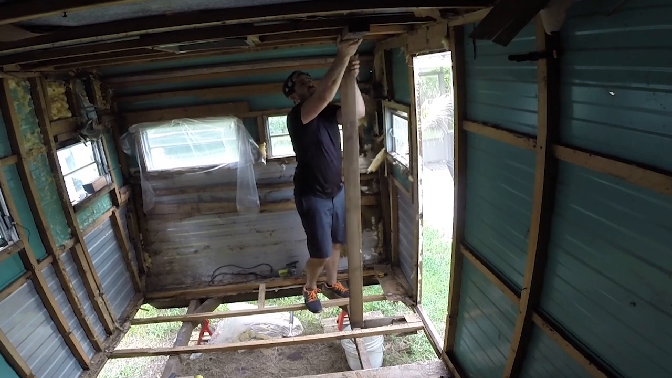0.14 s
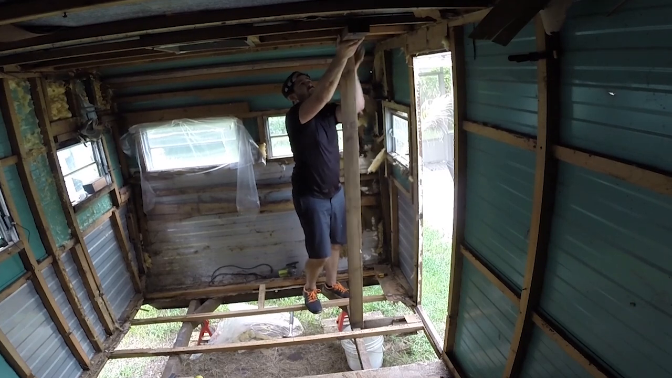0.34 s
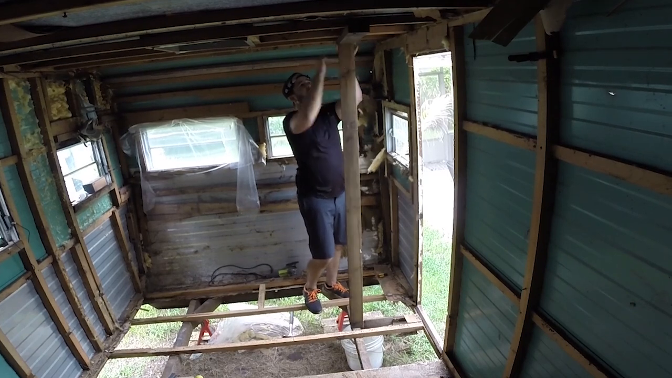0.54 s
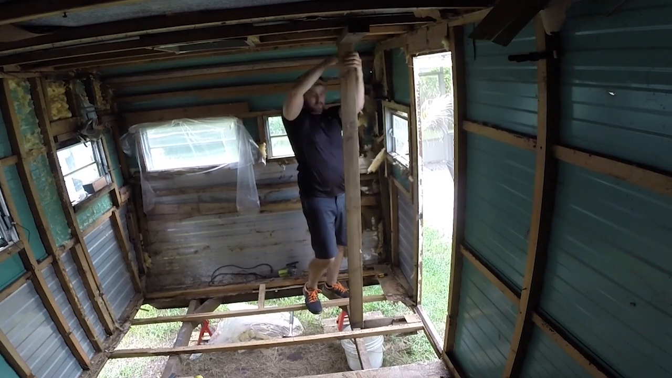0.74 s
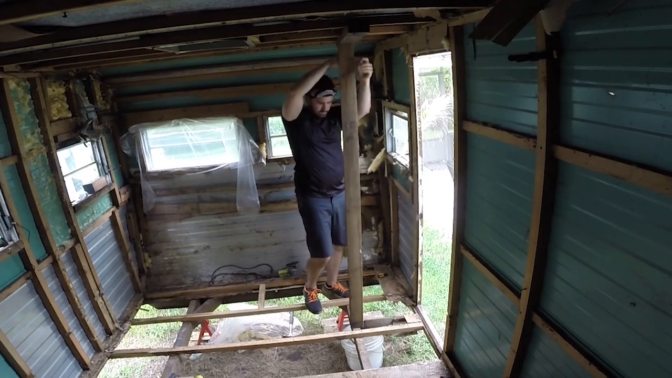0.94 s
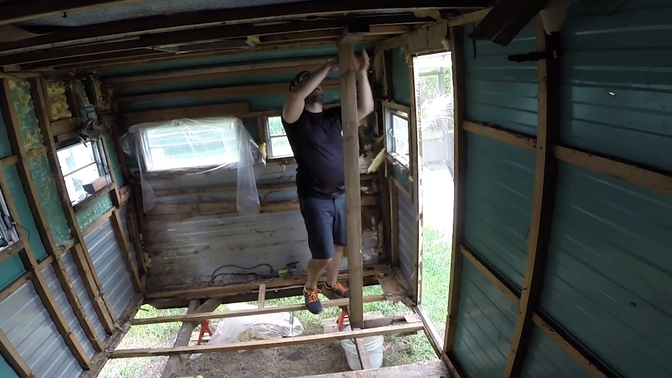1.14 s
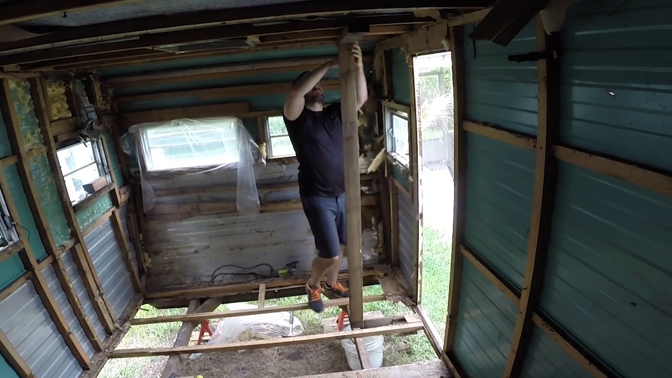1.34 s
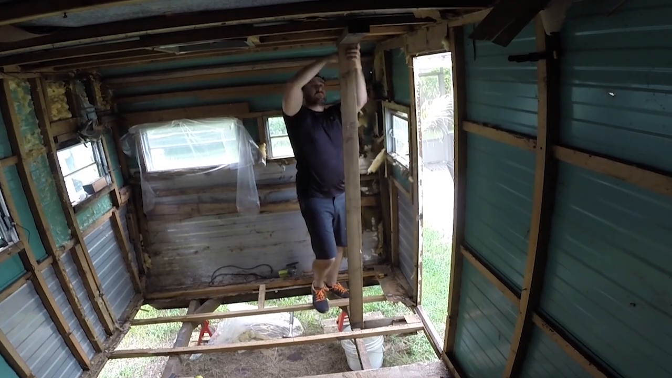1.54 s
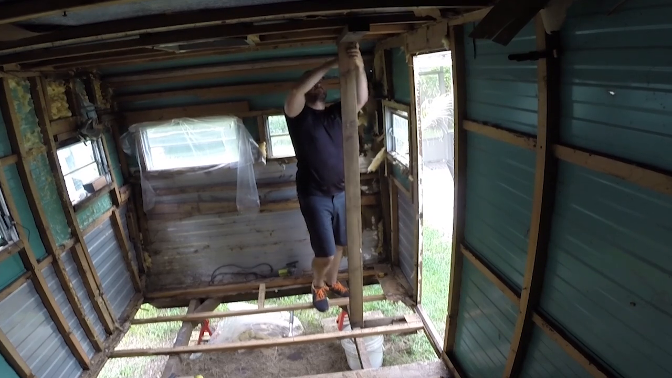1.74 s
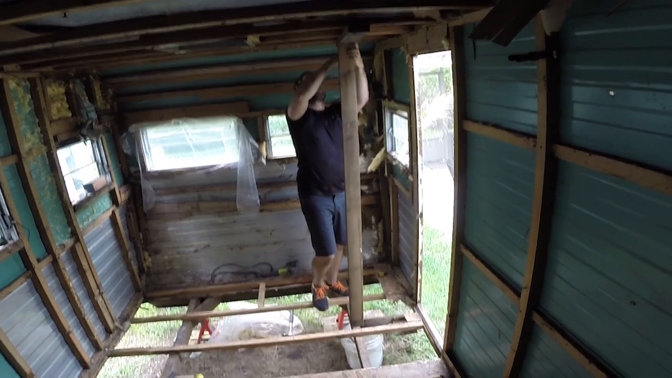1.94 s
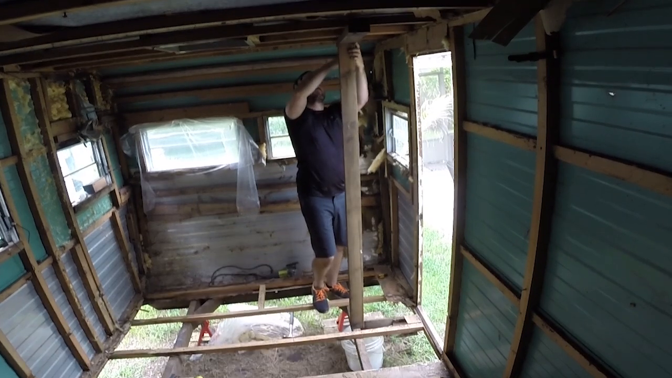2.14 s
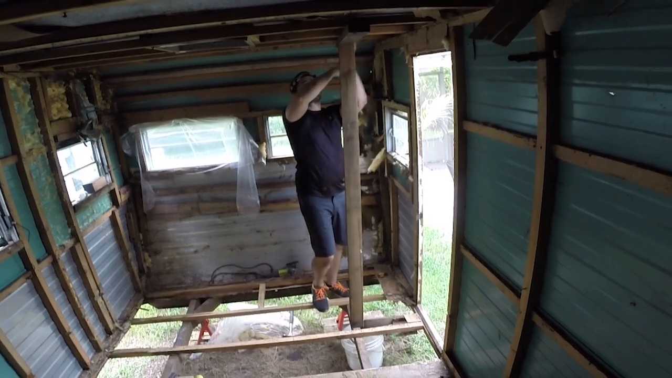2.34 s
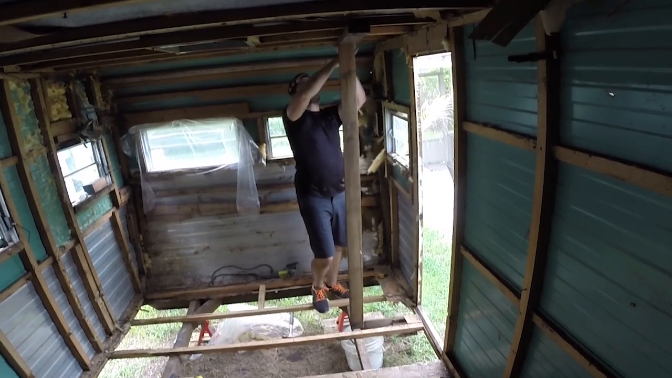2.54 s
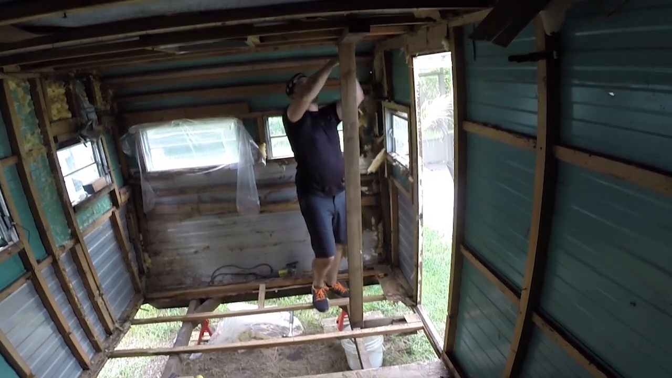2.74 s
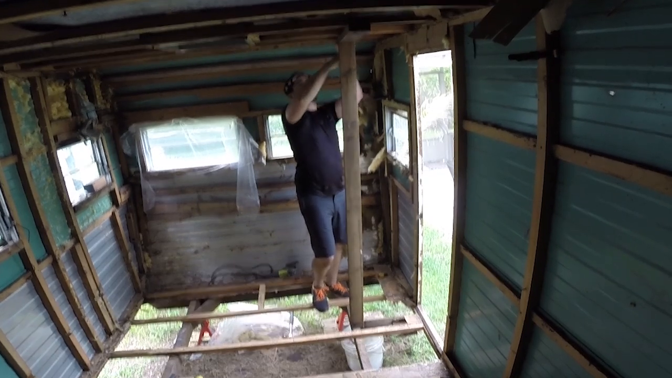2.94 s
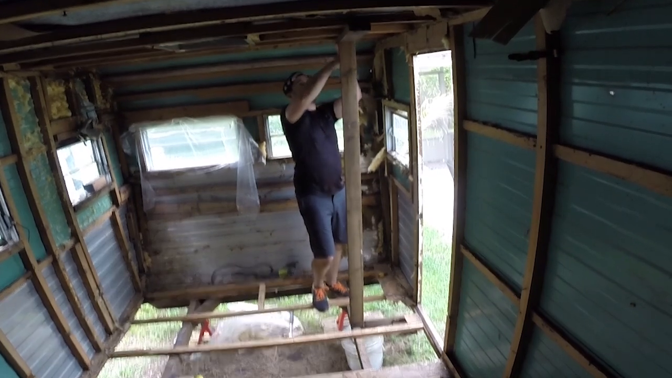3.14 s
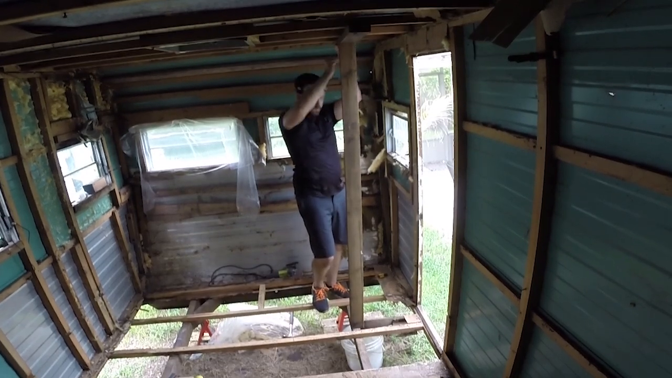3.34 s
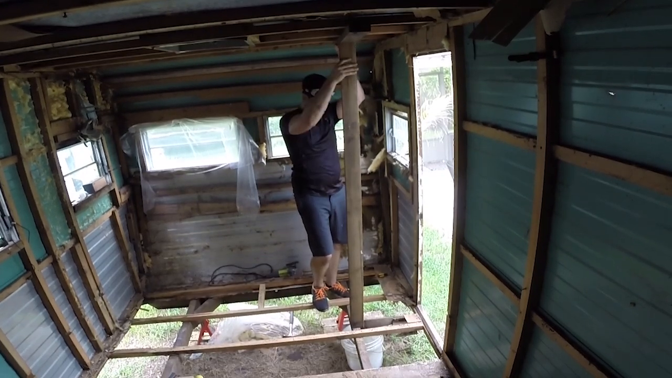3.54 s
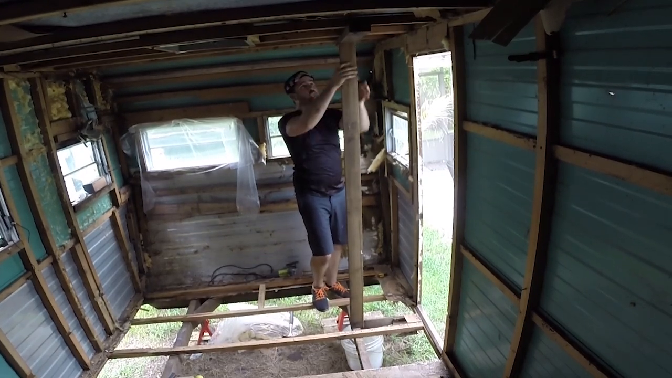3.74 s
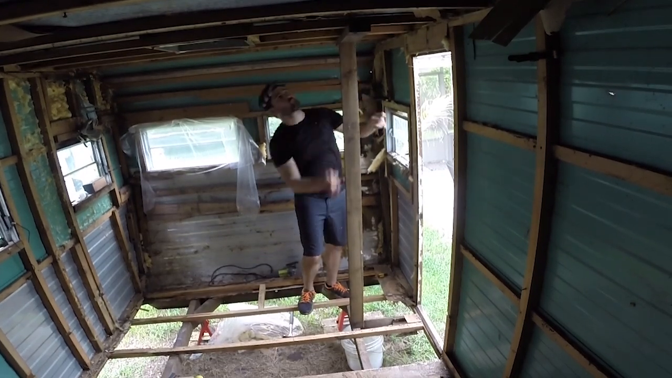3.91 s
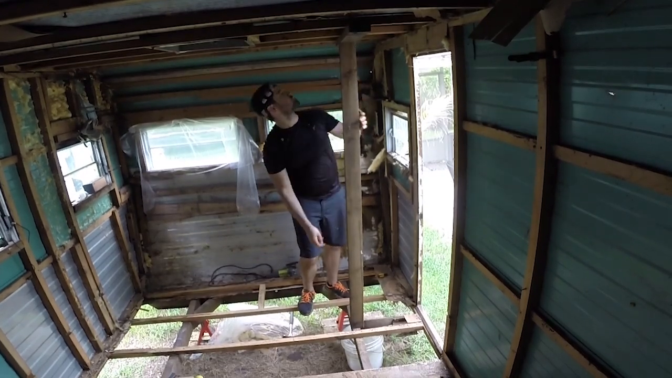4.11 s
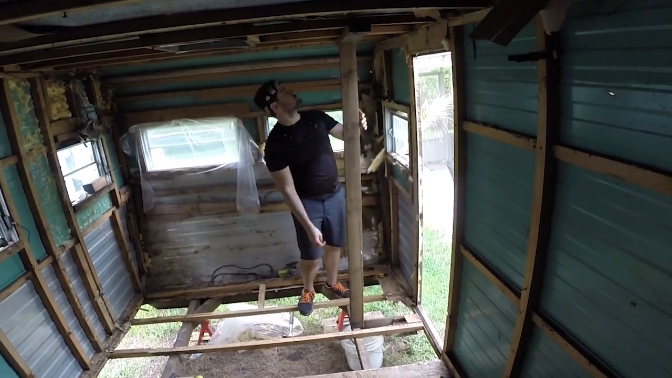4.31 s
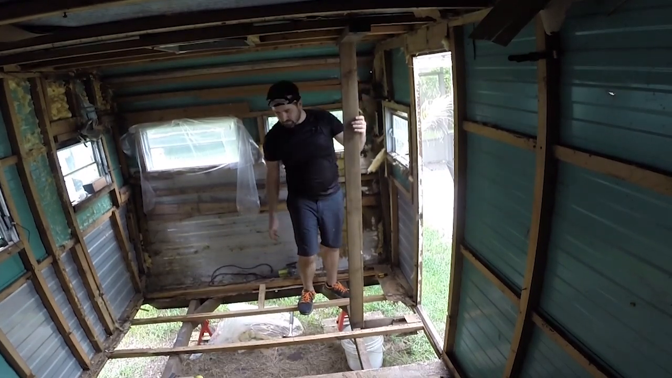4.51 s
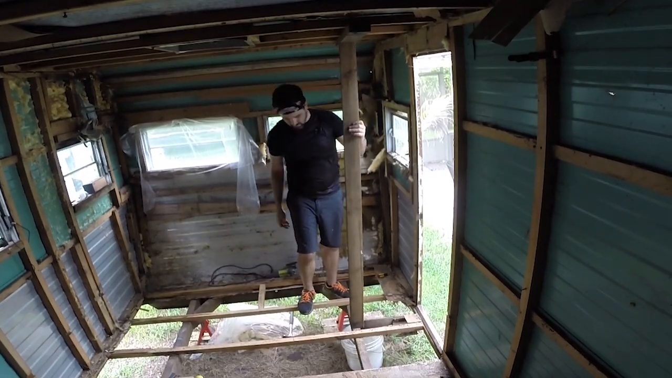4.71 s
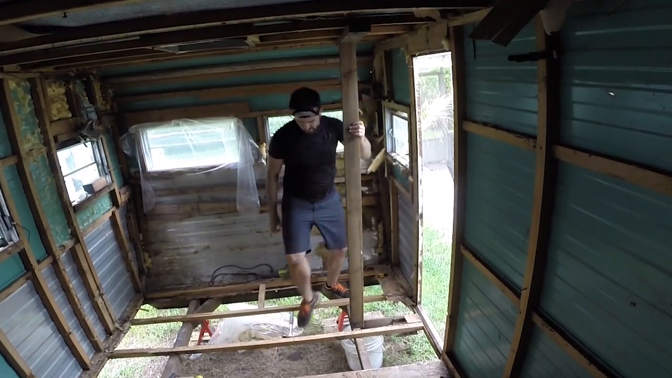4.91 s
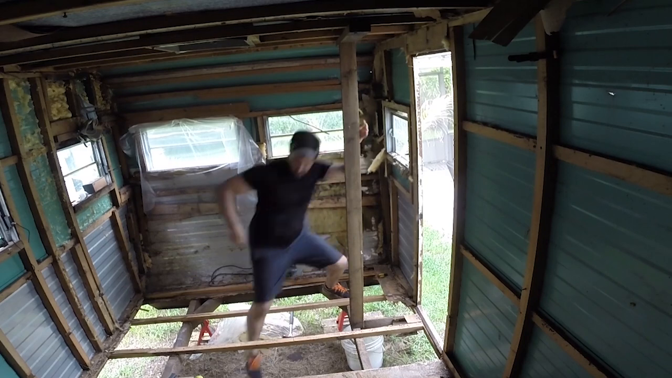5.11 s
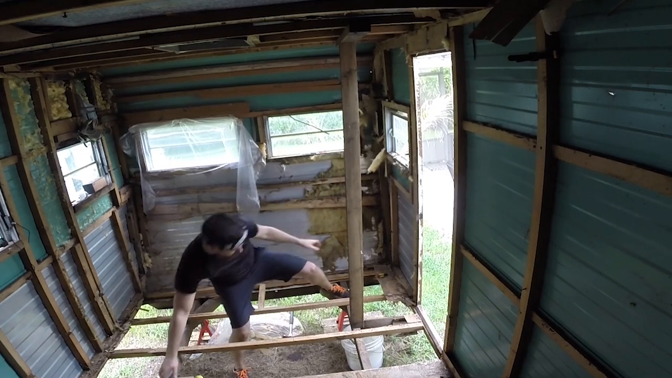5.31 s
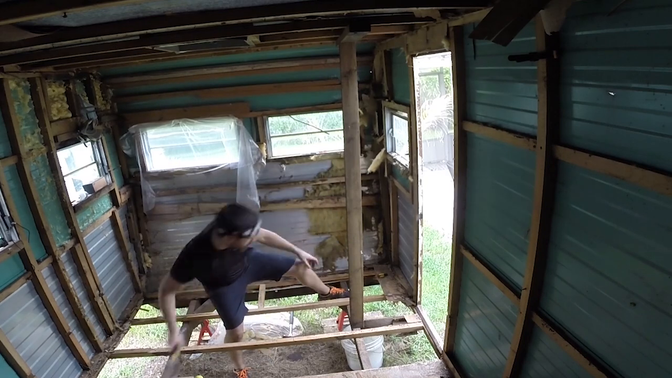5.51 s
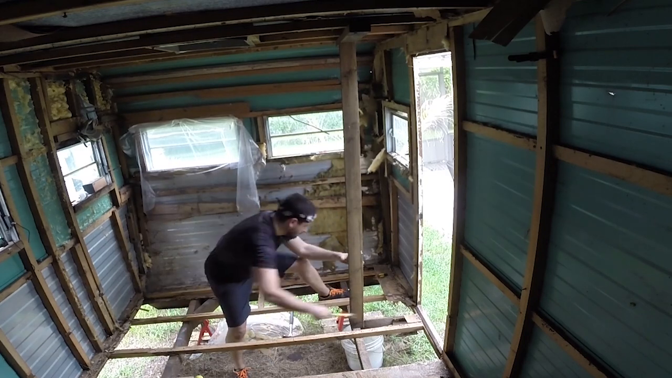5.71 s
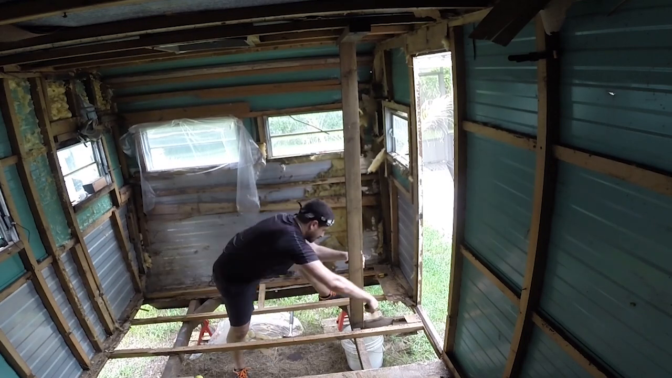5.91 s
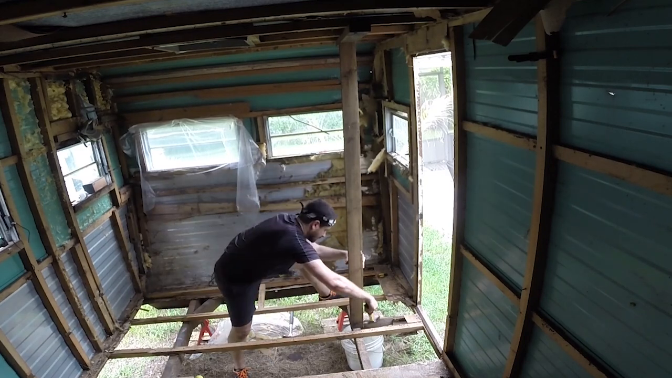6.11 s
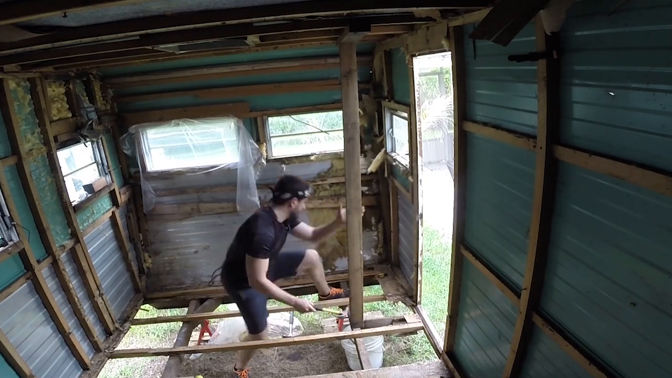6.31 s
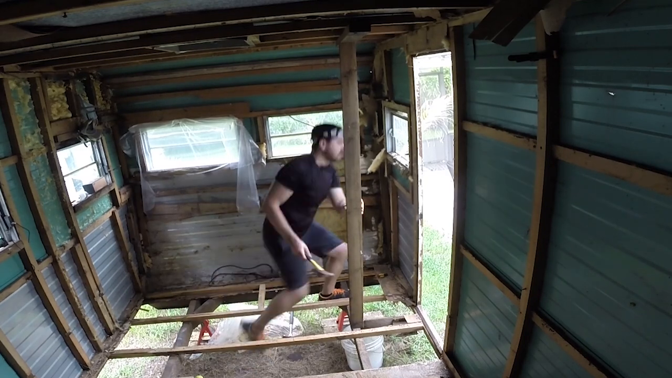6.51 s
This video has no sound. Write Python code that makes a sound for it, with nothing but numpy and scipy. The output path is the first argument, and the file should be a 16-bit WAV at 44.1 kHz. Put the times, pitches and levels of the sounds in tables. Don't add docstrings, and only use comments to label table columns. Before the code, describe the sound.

A steady low motor hum and soft air noise fill a small sheet-walled space. A softer knock opens, then near quiet. A rapid hammering driver burst starts weakly and swells, bit ringing and loose panels slapping the frame. Afterwards come light shoe scuffs, tiny squeaks and dull steps on joists, and finally three sharp, resonant knocks on a wooden post, heard by one stationary microphone a few metres away.

```python
import sys
import numpy as np
from scipy import signal
from scipy.io import wavfile

SR = 44100
rng = np.random.default_rng(int(sys.argv[2]) if len(sys.argv) > 2 else 0)


def natural_amplitude(level_db):
    exponent = np.asarray(level_db, float) / 20
    return 10 ** exponent


def materialize(psi):
    bounded = np.clip(np.atleast_2d(psi).T, -1, 1)
    quanta = np.round(bounded * 32767).astype(np.int16)
    wavfile.write(sys.argv[1], SR, quanta)


N = 289296
T = np.arange(N) / SR
BAND_EDGES = 18 * 2 ** np.arange(0, 10.1, 1 / 3)

# [t/s, peak level above 2.5 kHz/dB, body level 0.8-2.5 kHz/dB, rattle length/s]
DRIVER_BLOWS = [(1.577, -43, -41.5, 0.029), (1.6477, -32.5, -34, 0.03), (1.722, -30, -34, 0.051),
                (1.786, -26, -34, 0.02), (1.8533, -21, -31, 0.046), (1.9266, -22, -29, 0.036),
                (1.992, -20.5, -31.5, 0.028), (2.067, -21, -29.5, 0.05), (2.1407, -21, -31.5, 0.051),
                (2.2163, -20, -27.5, 0.052), (2.294, -21.5, -31, 0.034), (2.3667, -25, -37.5, 0.035),
                (2.4598, -20.5, -29, 0.026), (2.5325, -19.5, -28.5, 0.028), (2.6127, -23, -32.5, 0.02),
                (2.6898, -15.5, -26.5, 0.023), (2.765, -22.5, -24.5, 0.024), (2.838, -18.5, -29.5, 0.025),
                (2.9114, -21, -28.5, 0.053), (2.983, -18, -29.5, 0.047), (3.0552, -15.5, -26, 0.01),
                (3.1349, -18, -23, 0.017), (3.2223, -21.5, -28.5, 0.053), (3.303, -14, -22, 0.0093),
                (3.3796, -29.5, -37.5, 0.028), (3.42, -34, -51, 0.016)]


def rms_one(x):
    return x / np.sqrt(np.mean(x ** 2) + 1e-20)


def at_hz(points, hz):
    table_hz, values = np.array(points)[:, 0], np.array(points)[:, 1]
    return np.interp(np.log(hz), np.log(table_hz), values)


def by_range(hz, levels_db, centres):
    return np.array([np.interp(np.log(hz), np.log(centres), row) for row in levels_db])


def drift(rate):
    r = np.exp(-80 * np.pi * rate / SR)
    white = rng.standard_normal(N // 40 + 2002)
    slow = signal.lfilter([1], [1, -2 * r, r * r], white)[2000:]
    return np.interp(np.arange(N) / 40, np.arange(len(slow)), rms_one(slow))


def ring(clicks, hz, t60):
    r = natural_amplitude(-60 / (t60 * SR))
    w = 2 * np.pi * hz / SR
    return signal.lfilter([0, np.sin(w)], [1, -2 * r * np.cos(w), r * r], clicks + 1e-18)


def bands(low_hz, high_hz):
    white = rng.standard_normal((2, N))
    for k, (low, high) in enumerate(zip(BAND_EDGES, BAND_EDGES[1:])):
        centre = np.sqrt(low * high)
        if low_hz < centre < high_hz:
            band = signal.butter(2, [low, high], "band", fs=SR, output="sos")
            yield centre, signal.sosfilt(band, white[k % 2])


def train(times, gains):
    clicks = np.zeros(N)
    clicks[np.round(np.asarray(times) * SR).astype(int)] = gains
    return clicks


def dying(clicks, t60, rise_s):
    r, q = natural_amplitude(-60 / (t60 * SR)), np.exp(-1 / (rise_s * SR))
    decay = signal.lfilter([1], [1, -r], clicks + 1e-18)
    return signal.lfilter([1 - q], [1, -q], decay)


def grit(per_s, spread_db):
    sizes = natural_amplitude(spread_db * np.minimum(rng.exponential(1, N), 4)) * rng.choice([-1, 1], N)
    return rms_one(sizes * (rng.random(N) < per_s / SR))


def background():
    # [f/Hz, level per Hz/dB]
    air_colour = [(12, -49), (20, -15.5), (135, -0.5), (229, -10.5), (330, -9.5), (359, -16), (437, -6),
                  (475, -9), (787, -11.5), (856, -14.5), (931, -15.5), (1340, -17.5), (1540, -20.5),
                  (3480, -29), (16200, -44)]
    # [f/Hz, rms level/dB]
    housing = [(140.0, -49), (328.4, -56), (565.2, -62), (597.5, -61), (651.4, -61), (759.0, -63)]
    # [multiple, rms level/dB]
    orders = [(3, -58), (5, -60), (6, -54), (7, -68), (9, -59), (13, -71), (15, -71), (18, -70), (19, -75),
              (21, -68), (23, -74), (24, -69), (35, -73), (38, -81), (39, -76), (43, -81), (46, -83),
              (50, -79), (55, -82), (67, -82), (71, -85), (92, -89), (93, -86), (96, -88)]
    # [f/Hz, rms level/dB, t60/s]
    rough_tones = [(108.2, -58.5, 0.22), (292, -52.5, 0.31), (428.5, -58.5, 0.34)]
    air_db, shaft_hz = -40.5, 146.53
    air = rms_one(sum(natural_amplitude(at_hz(air_colour, hz) + 0.71 * drift(2.5)) * noise for hz, noise in bands(20, 17000)))
    waver = np.cumsum(0.000633 * drift(2.79)) / SR
    hum = np.zeros(N)
    for hz, tone_db in list(housing) + [(k * shaft_hz, order_db) for k, order_db in orders]:
        tone = np.sin(2 * np.pi * (hz * (T + waver) + rng.random()))
        hum += np.sqrt(2) * natural_amplitude(tone_db + 1.5 * drift(4)) * tone
    drone = np.zeros(N)
    for hz, tone_db, t60 in rough_tones:
        drone += natural_amplitude(tone_db) * rms_one(ring(rng.standard_normal(N), hz, t60))
    return natural_amplitude(air_db - 2.5) * air + hum + drone


def shaking_db():
    # [t/s, level/dB]
    biting = [(1.46, -60), (1.5, -46), (1.68, -34.5), (1.89, -26), (2.31, -22), (2.44, -33), (2.5, -27),
              (2.95, -22), (3.45, -23.5)]
    # [t/s, level/dB]
    jolts = [
        (0.0, -24.5),
        (0.097, -22.5),
    ]
    settle_db_per_s = 114
    driven = np.interp(T, *np.transpose(biting), -200, -200)
    for s, jolt_db in jolts:
        driven[int(s * SR)] = jolt_db
    return np.maximum.accumulate(driven + settle_db_per_s * T) - settle_db_per_s * T


def slaps_on_frame(shake_db):
    slap_lag_s, slap_db, spread_db = 0.00518, 3.5, 3
    rebound_s, rebound_db = 0.045, -10.5
    at = np.array(DRIVER_BLOWS)[:, 0]
    luck = rng.normal(0, 1, (len(at), 4))
    size_db = np.interp(at, T, shake_db) + slap_db
    first_size = np.sign(luck[:, 0]) * natural_amplitude(size_db + spread_db * luck[:, 1])
    again_size = natural_amplitude(size_db + rebound_db + spread_db * luck[:, 3])
    first = train(at + slap_lag_s, first_size)
    again = train(at + rebound_s * (1 + 0.25 * luck[:, 2]), again_size)
    return first - again


def walls():
    # [f/Hz, level/dB]
    panels = [(165, -1.5), (198, 5), (223, 9.5), (263, 10.5), (300, 7.5), (325, 5.5), (368, 5.5),
              (400, 10.5), (440, 0), (497, 7.5), (545, 9), (590, 2.5), (660, 6), (760, -1.5), (850, 2),
              (945, 0.5), (1050, -17), (1200, -1)]
    # [f/Hz, level per Hz/dB]
    deep_colour = [(12, -41), (20, -5.5), (59, 4.5), (86, 4.5), (119, -5), (171, 0.5), (200, 0), (260, -30),
                   (440, -120)]
    deep_db, deep_follows = -28, 0.36
    jolt = dying(train(np.array(DRIVER_BLOWS)[:, 0], 0.99), 0.088, rise_s=0.006)
    shake_db = shaking_db()
    push = natural_amplitude(shake_db) * (0.53 + 0.87 * jolt)
    boom, plain = np.zeros(N), np.zeros(N)
    for hz, panel_db in panels:
        slaps = grit(500, spread_db=3.0)
        plain += natural_amplitude(panel_db) * ring(slaps, hz, 16.8 / hz)
        boom += natural_amplitude(panel_db) * ring(slaps * push, hz, 27.6 / hz)
    boom *= natural_amplitude(1.0) / np.std(plain)
    thumps = ring(ring(slaps_on_frame(shake_db), 280, 0.004), 590, 0.0017)
    deep = rms_one(sum(natural_amplitude(at_hz(deep_colour, hz)) * noise for hz, noise in bands(23, 170)))
    deep *= natural_amplitude(deep_db - 3 + deep_follows * (shake_db + 26))
    buzz_band = signal.butter(1, [1100, 3500], "band", fs=SR, output="sos")
    buzz = signal.sosfilt(buzz_band, grit(3600, spread_db=2.5))
    return boom + natural_amplitude(-15.0) * push * buzz + thumps + deep


def scuffs():
    # [loudest t/s, rise/s, fall/s, level/dB, brightness/dB per octave]
    strokes = [(0.001, .01, 0.028, -40, -3.5), (0.18, .004, .1, -52, -2), (0.262, 0.18, .03, -56, -6),
               (1.45, .025, .05, -53, -6), (3.935, 0.06, .045, -43.5, -1), (5.0, 0.059, .06, -45, -2),
               (5.268, 0.13, .2, -49.5, -1.5), (5.44, .03, 0.14, -52, -2.5),
               (5.532, 0.016, 0.049, -38, 1.5), (5.88, .04, .12, -60, 3), (6.35, .015, 0.071, -54, -1),
               (6.518, .12, .15, -52.5, -4)]
    # [t/s, peak level/dB]
    ticks = np.array([
        (3.8955, -33),
        (5.1324, -44),
        (5.3996, -40),
        (5.4405, -39),
        (5.5303, -36),
    ])
    edge_db = 18.5
    stroke_level = np.zeros(N)
    for s, rise, fall, top_db, _ in strokes:
        away = np.maximum((s - T) / rise, (T - s) / fall)
        stroke_level += natural_amplitude(top_db - edge_db * away)
    points = np.vstack(strokes)
    slope_db = np.interp(T, points[:, 0], points[:, 4])
    snaps = dying(train(ticks[:, 0], natural_amplitude(ticks[:, 1] - 13)), 0.034, rise_s=0.0003)
    hiss = np.zeros(N)
    for hz, noise in bands(1000, 17000):
        hiss += noise * natural_amplitude((slope_db - 1.0) * np.log2(hz / 8000) + 3.2 * drift(42))
    return hiss * (0.68 * stroke_level + snaps)


def knocks():
    # [t/s, crack level/dB, body level/dB, thud level/dB, edge level/dB]
    rows = np.array([
        (0.0818, -10.5, -18.5, -22, -31.5),
        (6.0363, -4.5, -10, -6.5, -20.5),
        (6.1265, -7, -10.5, -8.5, -29),
        (6.2116, -6.5, -9.5, -8, -27.5),
    ])
    # [f/Hz, level per Hz/dB]
    colour = [(90, -4.5), (240, 6.5), (400, 8.5), (700, 13.5), (960, 8.5), (1500, 11), (2000, 4),
              (2400, 2.5), (3700, -3), (5600, -7), (7500, 7.5), (10000, 0), (15500, 0), (17000, -25)]
    # [f/Hz, t60/s]
    tail_t60 = [(100, 1.16), (260, 0.68), (700, 0.22), (1840, 0.14), (4850, 0.092), (12800, 0.076)]
    # [f/Hz, level/dB, t60/s]
    post = [(200, -12, 0.46), (244, -12, .3), (365.5, -9, 0.29), (397, -21, 0.17), (923, -16, 0.12),
            (1200, -22, 0.12), (1540, -23, 0.21), (1960, 0.5, 0.14), (2630, -17, 0.047), (3450, -13, 0.048),
            (3760, -5.5, 0.052), (4010, -15, 0.078), (6660, -13, 0.069), (7600, -36, 0.086)]
    contact_s, doubles_db = 0.00067, 7.5
    thump_lag_s, thump_db, thump_hz = 0.00912, 2, 560
    at, thud_db = rows[:, 0], rows[:, 3]
    luck = rng.normal(0, 1, (len(rows), 60))
    landed = at + contact_s * 2 ** ((-8 - thud_db) / doubles_db)
    level_db, centres = rows[:, [3, 2, 1, 4]], [500, 1500, 4000, 10000]
    out = np.zeros(N)
    for k, (hz, noise) in enumerate(bands(80, 17000)):
        size = natural_amplitude(by_range(hz, level_db, centres) + luck[:, k])
        hits = natural_amplitude(-8.5) * train(at, size) + natural_amplitude(-7.5) * train(landed, size)
        tail = dying(hits, at_hz(tail_t60, hz), rise_s=2.7 / hz)
        crack = dying(train(landed, size), 0.054, rise_s=1.0 / hz)
        out += natural_amplitude(at_hz(colour, hz)) * noise * natural_amplitude(-2.5) * (tail + crack)
    for k, (hz, mode_db, t60) in enumerate(post):
        size = natural_amplitude(by_range(hz, level_db, centres) + mode_db - 10 + 2 * luck[:, 30 + k])
        out += ring(train(landed, size), hz, min(t60, 160.0 / hz))
    thump_clicks = train(at + thump_lag_s, -natural_amplitude(thud_db + thump_db - 21))
    thump = ring(ring(thump_clicks, thump_hz, 0.0083), 0.76 * thump_hz, 0.0077)
    out += signal.sosfilt(signal.butter(1, 150, "high", fs=SR, output="sos"), thump)
    snap = ring(train(landed, natural_amplitude(thud_db + 1.0)), 3760, 0.005)
    return out + snap


def blows():
    # [f/Hz, level per Hz/dB]
    colour = [(600, 26.5), (900, 20), (1400, 12), (1950, 10.5), (2600, -2.5), (3500, 0.5), (4500, 0.5),
              (5800, -9.5), (7800, -3.5), (9500, -15.5), (12000, -4.5), (15500, -32), (17000, -40)]
    # [f/Hz, t60/s]
    tail_t60 = [(600, 0.31), (1300, 0.31), (3500, 0.13), (9000, 0.11)]
    # [f/Hz, level/dB, t60/s]
    bit = [(1950, -12.5, 0.066), (3060, -25, 0.035), (3463, -14, 0.055), (3815, -16.5, 0.1),
           (4100, -19, 0.094), (5150, -16.5, 0.036), (6400, -17, 0.045), (7690, -8.5, 0.019),
           (10500, -31.5, 0.029)]
    full_hit_lag_s, crack_db = 0.00069, -8.5
    tight_db_per_halving = 0.5
    rows = np.array(DRIVER_BLOWS)
    at, rattle_s = rows[:, 0], rows[:, 3]
    luck = rng.normal(0, 1, (len(rows), 40))
    ends = at + np.clip(rattle_s, 0.008, 0.045)
    held = np.cumsum(train(at, 0.97) - train(ends, 0.95))
    loose = signal.lfilter([0.008], [1, -0.992], held)
    loose = loose * natural_amplitude(1.0 * drift(170))
    tightness = natural_amplitude(tight_db_per_halving * np.log2(0.031 / rattle_s))
    out = np.zeros(N)
    for k, (hz, noise) in enumerate(bands(600, 17000)):
        size = natural_amplitude(by_range(hz, rows[:, [2, 1]], [2000, 2800]) + 0.5 * luck[:, k])
        tick, full_hit = train(at, size), train(at + full_hit_lag_s, size)
        tail = dying(natural_amplitude(-8.5) * tick + natural_amplitude(-4.5) * full_hit, at_hz(tail_t60, hz), rise_s=4.7 / hz)
        crack = dying(train(at, size * tightness), 0.025, rise_s=0.000082)
        rattling = tail * (natural_amplitude(-14.5) + natural_amplitude(-11.5) * loose)
        out += natural_amplitude(at_hz(colour, hz)) * noise * (rattling + natural_amplitude(crack_db) * crack)
    for k, (hz, mode_db, t60) in enumerate(bit):
        size = natural_amplitude(rows[:, 1] + mode_db - 6 + 5.1 * luck[:, 20 + k])
        out += ring(train(at + 0.00087, size), hz, t60)
    return out


def footfalls_and_squeaks():
    # [t/s, peak level/dB, f/Hz]
    steps = [
        (4.984, -35, 435),
        (5.13, -43, 706),
        (5.439, -28, 356),
        (5.517, -29, 457),
        (5.549, -33.5, 590),
        (3.924, -35.5, 450),
    ]
    # [t/s, f/Hz, level/dB, length/s]
    squeaks = [
        (3.918, 3450, -50, 0.053),
        (4.028, 8800, -65, .12),
        (4.15, 9500, -66, .05),
    ]
    out = np.zeros(N)
    for s, step_db, hz in steps:
        touch = dying(train([s], natural_amplitude(step_db - 20)), 0.087, rise_s=0.0066) * rng.standard_normal(N)
        out += ring(touch, hz, 0.056) + ring(touch, 1.32 * hz, 0.014) + 0.42 * ring(touch, 2.25 * hz, 0.028)
    for s, hz, squeak_db, length in squeaks:
        swell = np.exp(-((T - s) * 3.0 / length - 1.2) ** 2)
        out += natural_amplitude(squeak_db) * swell * rms_one(ring(rng.standard_normal(N), hz, 0.022))
    return out


def scene():
    mix = background() + walls() + scuffs() + knocks() + blows() + footfalls_and_squeaks()
    return mix[None]


def roll_off(x):
    return signal.sosfilt(signal.butter(12, 16400, fs=SR, output="sos"), x)


def record(dry):
    rounded = 2.5 * np.tanh(dry / 2.5)
    cut = signal.sosfilt(signal.cheby2(18, 40, 16050, fs=SR, output="sos"), rounded)
    cut = signal.sosfilt(signal.butter(2, 22, "high", fs=SR, output="sos"), cut)
    return roll_off(cut)


dry = scene()
out = record(dry)
materialize(out)
```